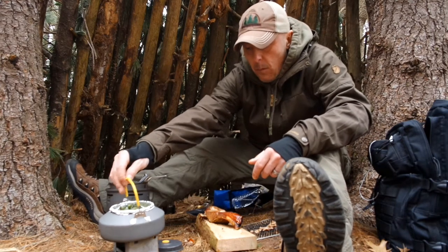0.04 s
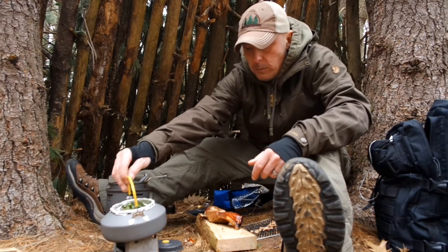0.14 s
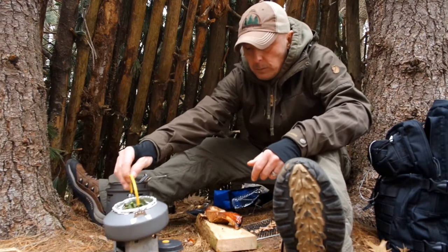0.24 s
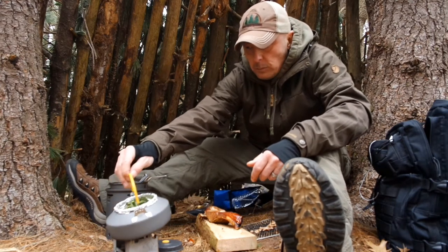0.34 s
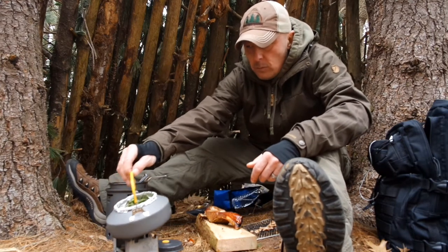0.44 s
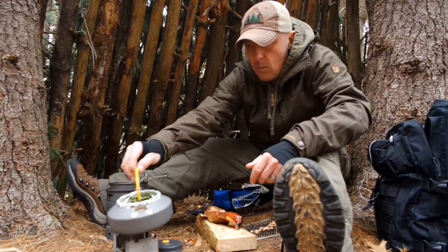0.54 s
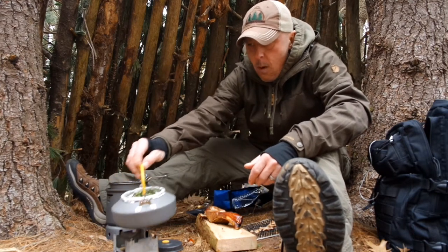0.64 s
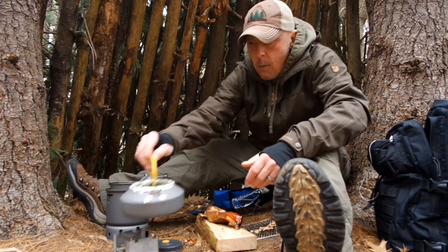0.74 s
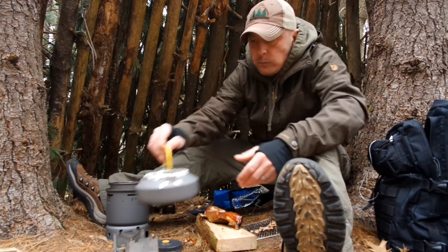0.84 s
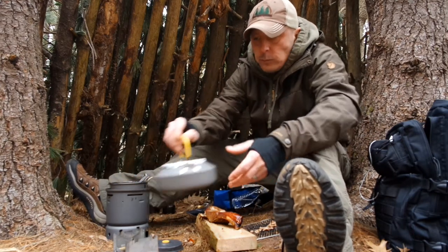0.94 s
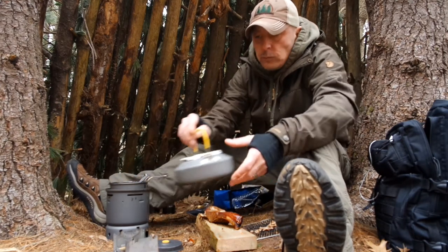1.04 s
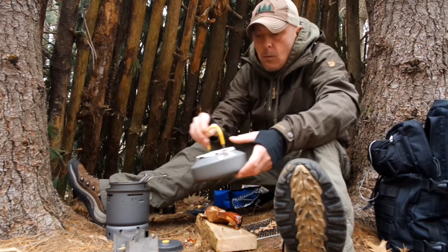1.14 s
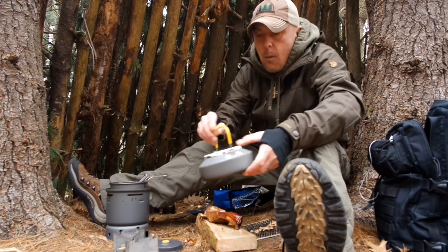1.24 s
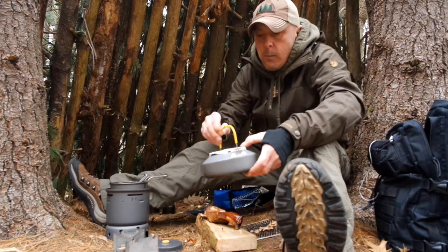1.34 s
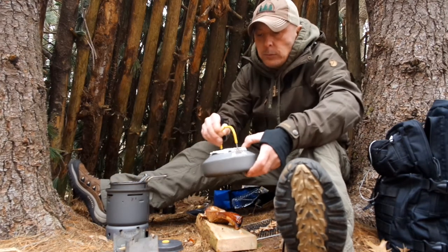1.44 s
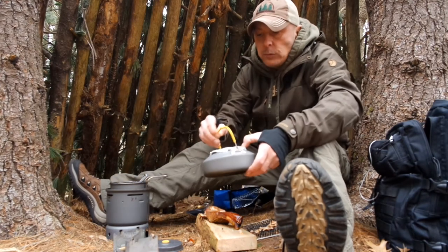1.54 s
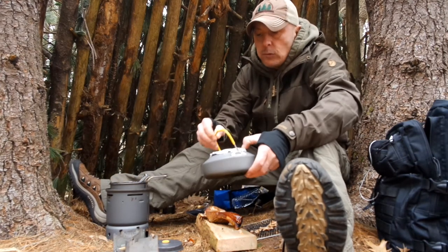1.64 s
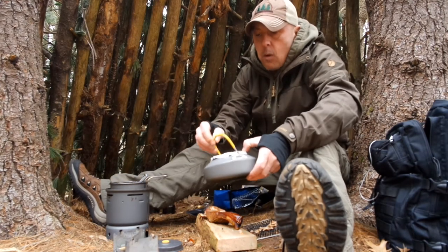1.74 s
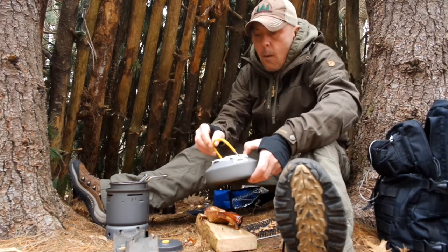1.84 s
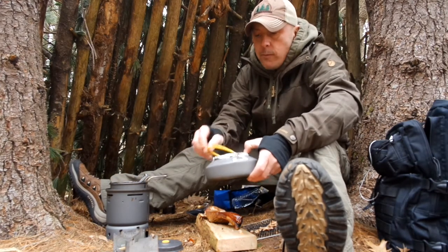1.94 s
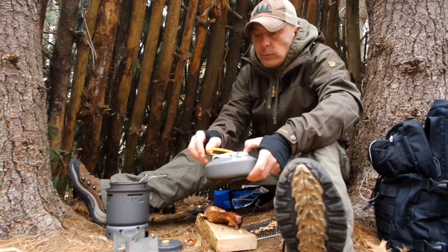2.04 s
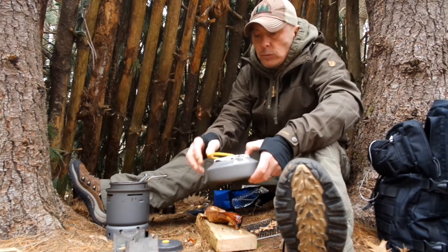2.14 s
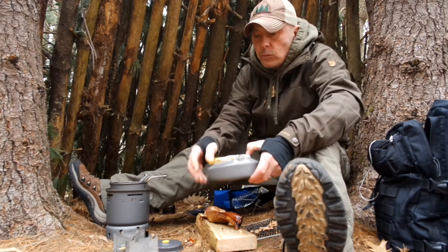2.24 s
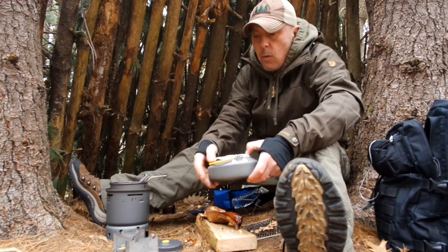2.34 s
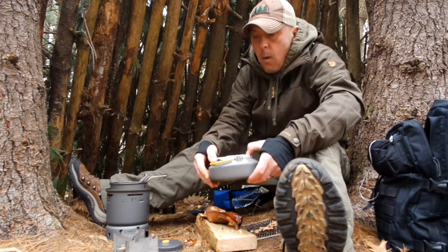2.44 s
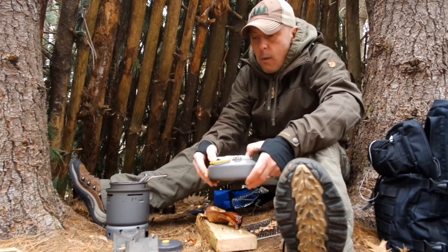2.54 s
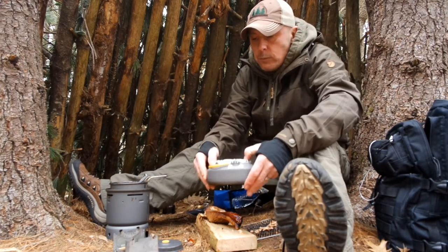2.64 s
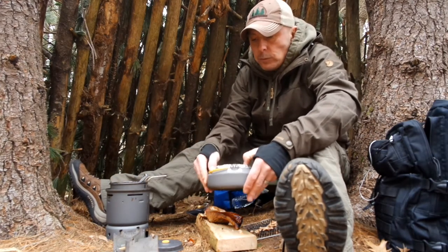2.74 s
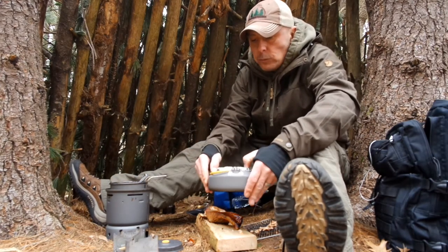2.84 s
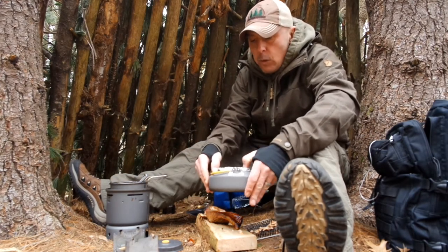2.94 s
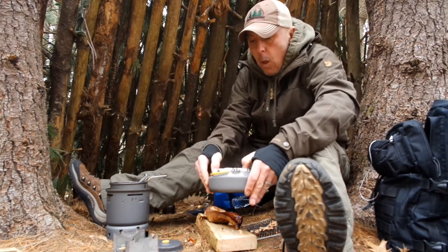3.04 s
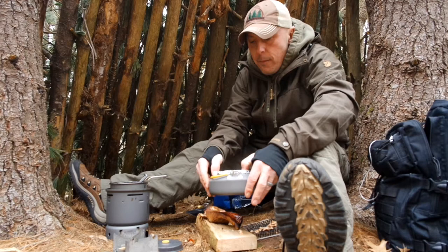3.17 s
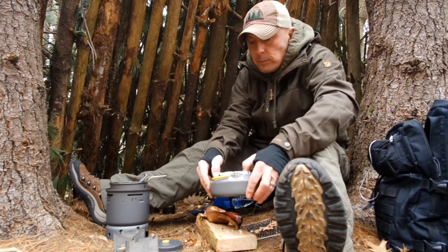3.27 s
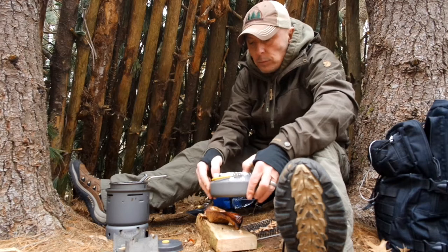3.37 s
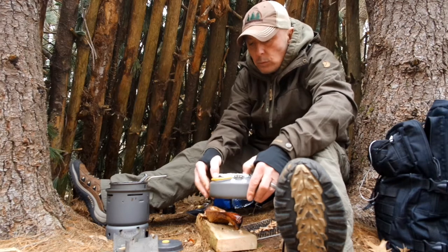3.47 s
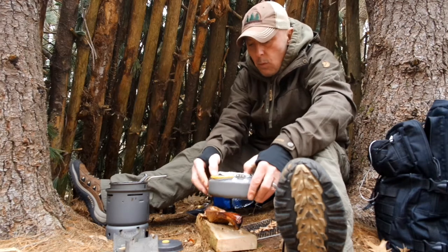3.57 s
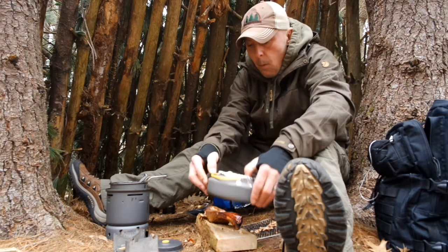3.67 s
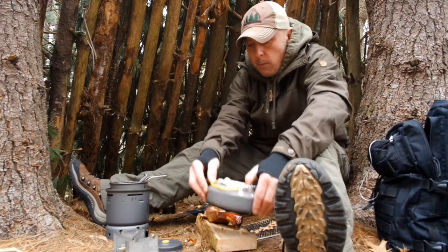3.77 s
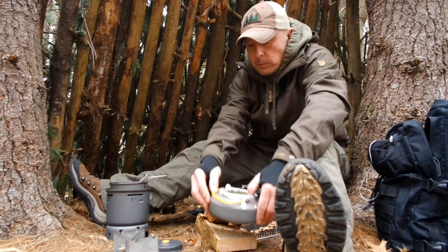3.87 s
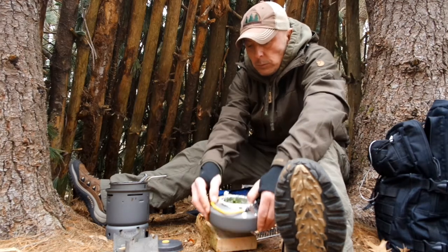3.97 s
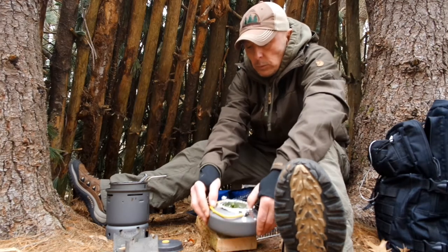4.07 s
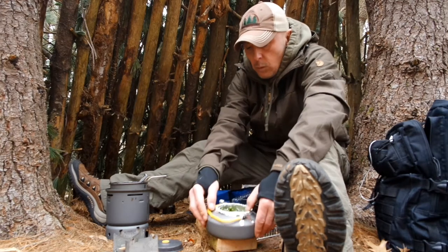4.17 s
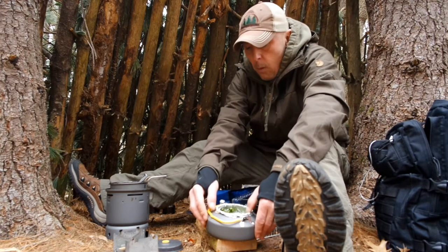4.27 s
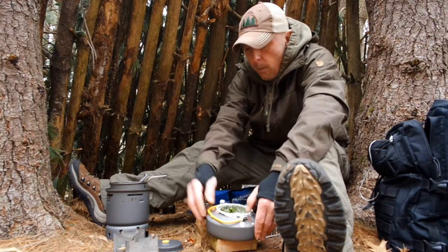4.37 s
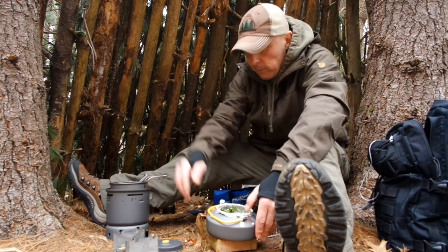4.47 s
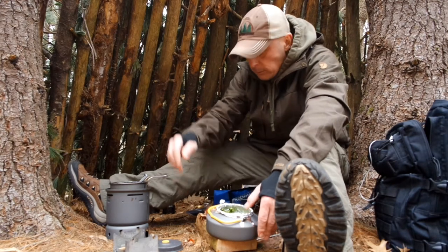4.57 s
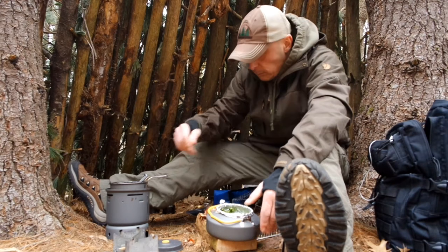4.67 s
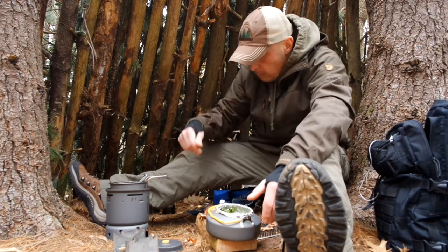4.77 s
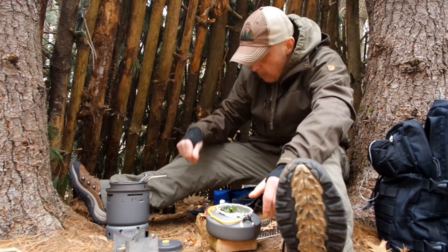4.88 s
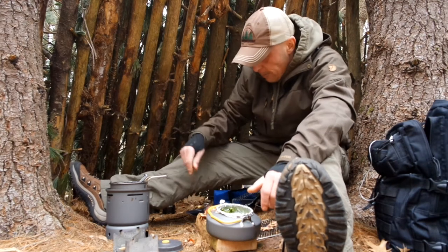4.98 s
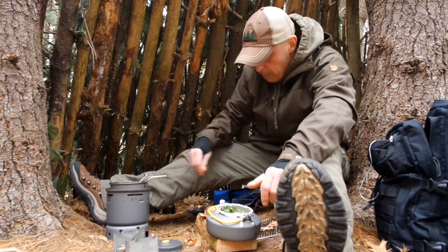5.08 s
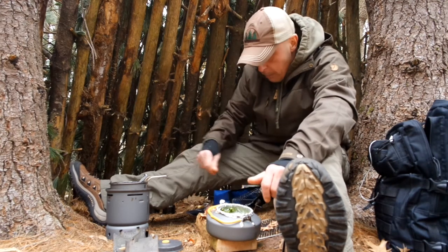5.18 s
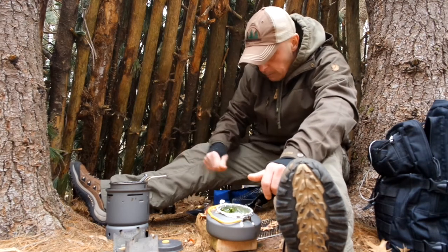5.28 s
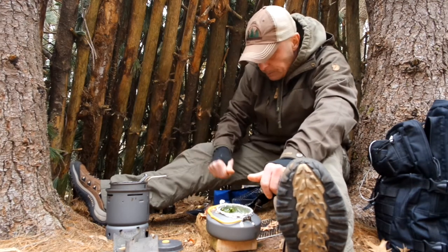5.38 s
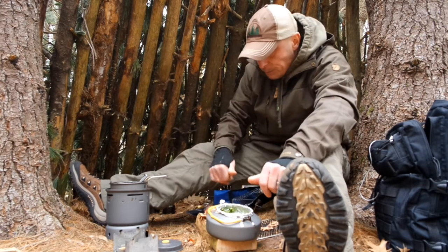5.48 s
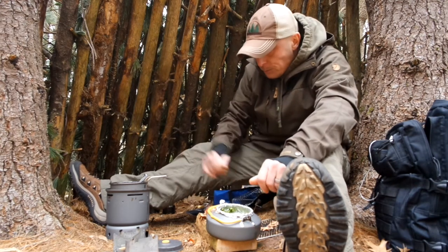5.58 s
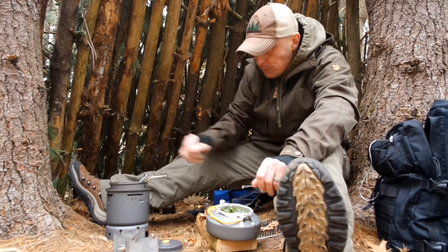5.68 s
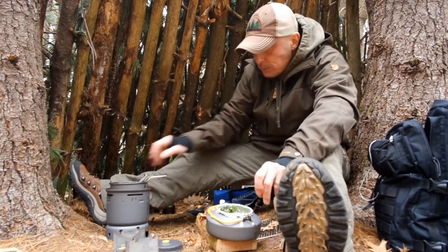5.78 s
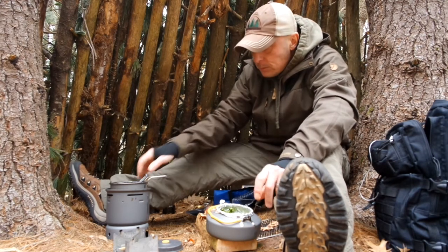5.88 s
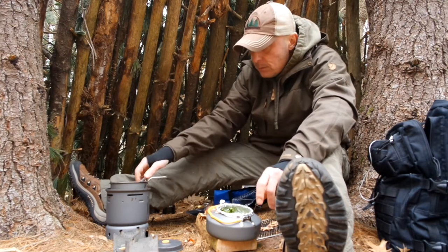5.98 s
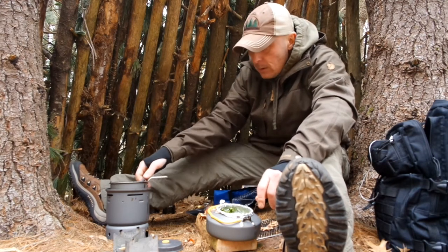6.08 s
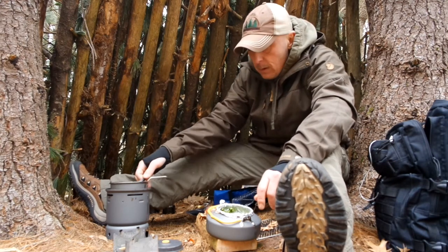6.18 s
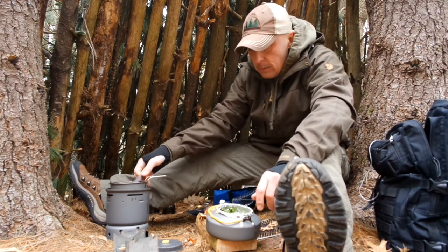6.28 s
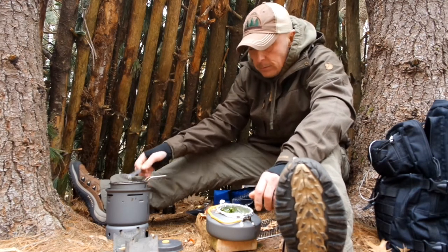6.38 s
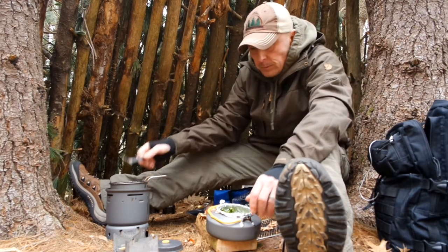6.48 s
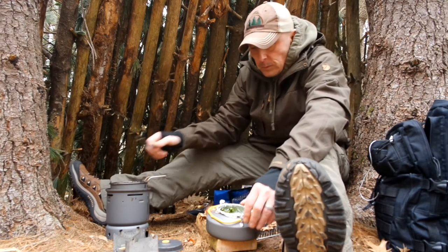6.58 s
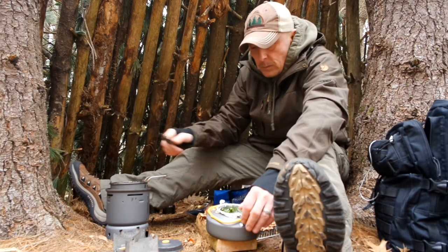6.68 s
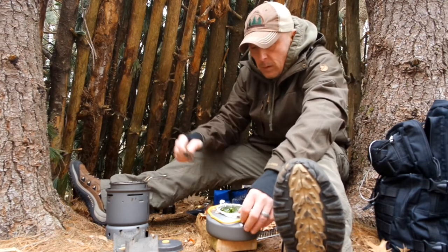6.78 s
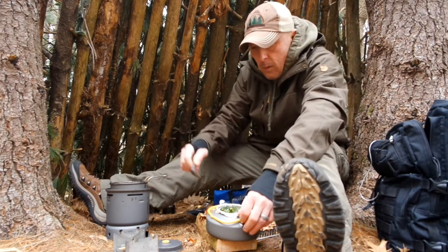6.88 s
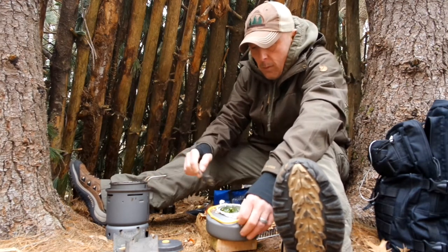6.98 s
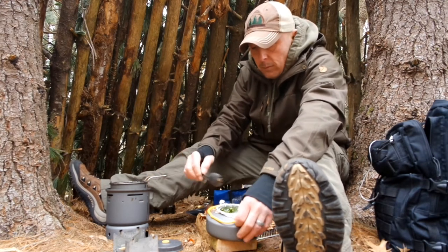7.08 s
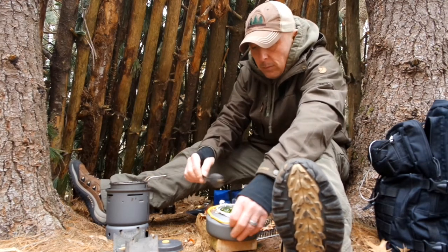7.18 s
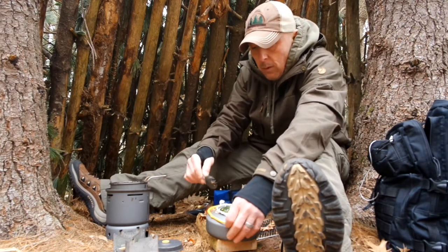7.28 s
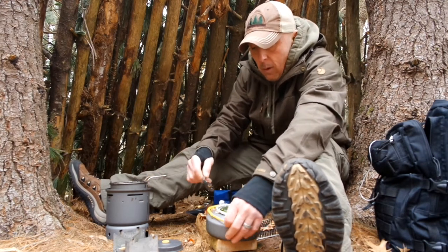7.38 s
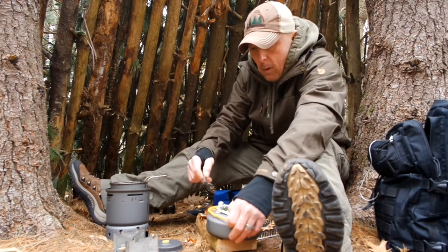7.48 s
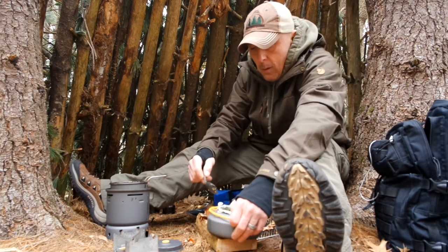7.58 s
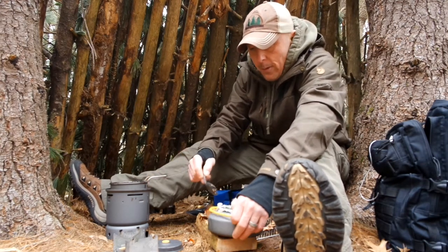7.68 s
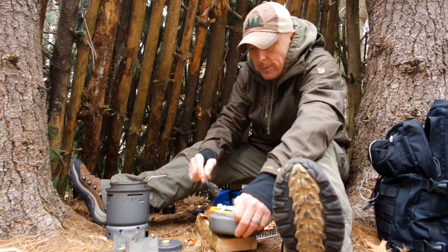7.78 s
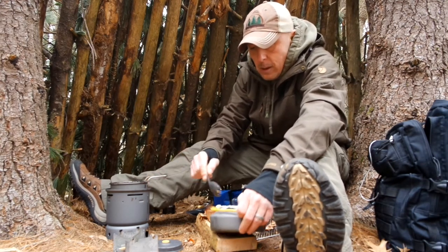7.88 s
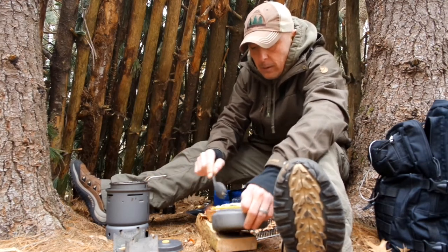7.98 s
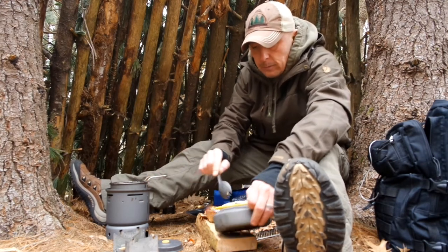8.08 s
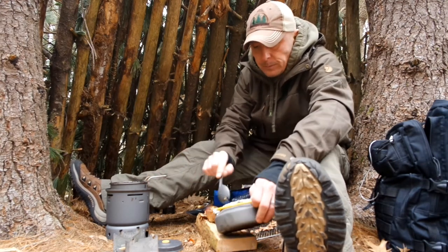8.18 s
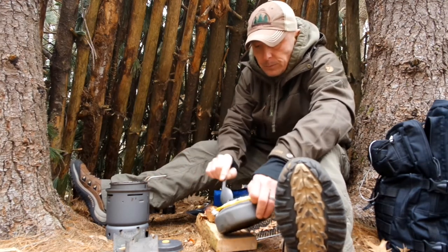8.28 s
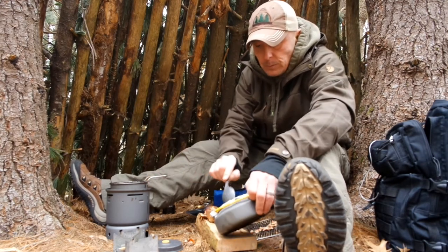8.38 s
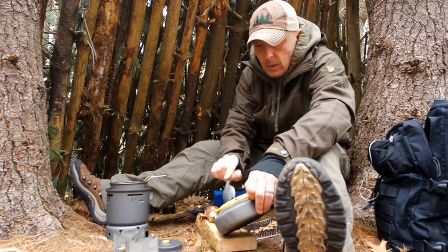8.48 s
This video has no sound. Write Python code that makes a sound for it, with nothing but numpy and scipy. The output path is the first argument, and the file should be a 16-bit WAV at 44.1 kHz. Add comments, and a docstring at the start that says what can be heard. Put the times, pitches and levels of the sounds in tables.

```python
"""In a lean-to of poles, a camper lifts a shallow metal pot off its stove, folds the handle down with
a clack, sets the pot on a board and takes a spoon to it. Each contact is chattering noise that also
rings decaying sine modes; dry snaps are coloured noise bursts. His jacket, noise under slow swells,
swishes and rumbles in a microphone worn on it. Sparse echoes and the camera's own steady noise lie behind."""
import sys
import numpy as np
from scipy import signal
from scipy.fft import next_fast_len
from scipy.io import wavfile
from scipy.ndimage import uniform_filter1d

SR = 44100
rng = np.random.default_rng(int(sys.argv[2]) if len(sys.argv) > 2 else 0)


def persist_wave(psi):
    """Save psi, clipped to +-1, as 16-bit WAV."""
    counts = np.round(np.clip(psi, -1, 1) * 32767).astype(np.int16)
    wavfile.write(sys.argv[1], SR, np.atleast_2d(counts).T)


N = 375638

# Arm and body moves: (peak time [s], swell [s], fade [s], sleeve rubbing level [dB],
# level of cloth bumping the microphone [dB])
MOVES = [(.02, 0.25, 0.7, -64.5, -54.5), (.38, 0.24, 0.28, -61, -54), (1.02, 0.22, 0.31, -57.5, -52),
         (1.22, 0.24, 0.33, -52, -42.5), (1.54, 0.33, 0.39, -63, -48.5), (1.78, 0.2, 0.16, -57.5, -43.5),
         (2.081, 0.22, 0.26, -61, -51.5), (2.58, 0.73, .5, -68, -50.5), (2.95, 0.36, 0.39, -59, -44.5),
         (3.66, 0.67, 0.56, -72, -64.5), (4.02, 0.42, 0.18, -66.5, -63.5), (4.33, 0.14, 0.18, -56, -51),
         (4.87, .7, 0.7, -69.5, -69), (5.26, 0.18, 0.28, -63.5, -62.5), (5.81, 0.23, 0.12, -64.5, -63),
         (6.2, 0.058, 0.43, -56.5, -50.5), (6.62, 0.46, 0.43, -67.5, -74), (7.08, 0.34, 0.56, -69.5, -68),
         (7.52, 0.1, .25, -56.5, -46), (7.95, 0.17, 0.5, -67.5, -60)]


def gain_of(db):
    """Turns decibels into an amplitude factor."""
    return 10 ** (np.asarray(db) / 20)


def evened(x):
    """Scales a signal to rms 1."""
    return x / np.sqrt(np.mean(x ** 2) + 1e-20)


def coloured(x, points):
    """Filters x by (frequency [Hz], level [dB]) points on a log-frequency axis, with causal phase."""
    size = next_fast_len(len(x) + 2048)
    hz, db = np.transpose(points)
    log_hz = np.log(abs(np.fft.fftfreq(size, 1 / SR)) + 1)
    log_gain = np.interp(log_hz, np.log(hz), db) * np.log(10) / 20
    # The Hilbert transform of the log gain gives the minimum phase
    response = np.exp(np.conj(signal.hilbert(log_gain)))
    return np.fft.ifft(np.fft.fft(x, size) * response).real[:len(x)]


def add(mix, s, sound):
    """Lays a sound into the mix from s seconds on, cut off at the end."""
    part = mix[round(s * SR):][:len(sound)]
    part += sound[:len(part)]


def drift(cutoff_hz):
    """Slow random wandering of rms 1: noise below a cutoff."""
    return evened(signal.lfilter(*signal.butter(2, cutoff_hz, fs=SR), rng.standard_normal(N)))


def camera_hiss():
    """The camera's own steady noise, weighted towards the bass."""
    # Spectrum: (frequency [Hz], relative level per Hz [dB])
    hiss_spectrum = [(12, -35.5), (30, -6.5), (117, -2), (429, -19), (800, -19.5), (6600, -32.5),
                     (13000, -30), (14700, -26)]
    return gain_of(-69) * evened(coloured(rng.standard_normal(N), hiss_spectrum))


def shelter(near):
    """Ground and poles throw back sparse, dulled echoes that die quickly."""
    t = np.arange(SR // 4) / SR
    signs = rng.choice([-1., 1.], len(t))
    sparse = (rng.random(len(t)) < .05) * (t > .004)  # no echo before 4 ms
    taps = signs * sparse * gain_of(-60 * t / 0.49)
    taps = coloured(taps, [(200, -1.5), (2000, -2.5), (14000, -14.5)])
    return signal.fftconvolve(near, taps / np.linalg.norm(taps))[:N]


def effort(peak_db):
    """Gain over time: the moves swell to a peak and fade, their powers adding up."""
    edge_db, roundness = -21.5, 1.12  # drop one swell before or one fade after the peak; shape of the top
    t = np.arange(0, N, 64) / SR
    peak, swell, fade = np.transpose(MOVES)[:3, :, None]
    away = np.where(t < peak, (peak - t) / swell, (t - peak) / fade)
    power = (gain_of(peak_db[:, None] + edge_db * away ** roundness) ** 2).sum(0)
    return np.interp(np.arange(N) / SR, t, np.sqrt(power))


def jacket():
    """Cloth on cloth hisses in fine uneven grains; folds bump the worn microphone in slow lumps."""
    # Spectrum of the rubbing: (frequency [Hz], relative level per Hz [dB])
    swish_spectrum = [(120, -28), (200, -5), (630, -5.5), (1760, -7), (5270, -13.5), (9000, -14),
                      (13000, -11), (14700, -15)]
    # Spectrum of the bumping: (frequency [Hz], relative level per Hz [dB])
    rumble_spectrum = [(7.1, -33.5), (12, -2), (71, 0), (127, -9), (168, -11.5), (500, -30.5), (650, -62),
                       (1100, -120)]
    still_rub_db, still_bump_db = -85, -75  # floors between moves
    rub_db, bump_db = np.transpose(MOVES)[3:]

    fibres = rng.standard_normal(N) * gain_of(1.5 * drift(30.0) + 0.65 * drift(440.0))
    rub_gain = np.hypot(effort(rub_db), gain_of(still_rub_db))
    swish = evened(coloured(fibres, swish_spectrum)) * rub_gain

    lumps = rng.standard_normal(N) * gain_of(3.2 * drift(14.))
    bump_gain = np.hypot(effort(bump_db), gain_of(still_bump_db))
    rumble = evened(coloured(lumps, rumble_spectrum)) * bump_gain
    return swish + rumble


def burst(rise, t60, tick, size):
    """Contact chatter: a first tick, then uneven grains that swell and die, the treble first."""
    t = np.arange(size) / SR
    noise, grain = rng.standard_normal((2, size))
    noise *= gain_of(3.6 * evened(uniform_filter1d(grain, size=24)))
    dull = signal.lfilter(*signal.butter(2, 5000., fs=SR), noise)
    bright = noise - dull
    decay = gain_of(-60 * t / max(t60, .003))
    chatter = (1 - np.exp(-t / rise)) * (dull * decay + bright * decay ** 1.5)
    chatter[0] += tick
    return chatter


def snaps():
    """Dry snaps, ticks and small knocks: short noise bursts, 12 dB down one spread from their centre."""
    # (time [s], peak level [dB], centre [Hz], spread [octaves])
    snap_list = [(.080, -25.5, 6760, 2.15), (0.191, -56.5, 2320, 0.066), (.541, -53.5, 2480, 0.58),
                 (1.175, -39.5, 810, 0.17), (1.338, -38, 11700, 0.72), (1.573, -42.5, 8050, 1.3),
                 (1.653, -45.5, 9000, 2.1), (1.757, -41.5, 2100, 0.24), (1.762, -31.5, 11900, 1.2),
                 (1.795, -34, 2360, 0.97), (1.823, -46, 10700, 0.34), (1.904, -52, 9100, 0.76),
                 (1.993, -44, 10100, 1.2), (2.245, -57.5, 3203, .4), (2.43, -55, 1470, 0.21),
                 (2.996, -38.5, 473, 0.12), (2.996, -42, 2350, 0.22), (3.997, -42.5, 493, 0.26),
                 (7.999, -42.5, 468, 0.09), (3.099, -45.5, 4930, 2.1), (3.81, -58.5, 2520, .3),
                 (4.387, -41.5, 2250, 0.25), (4.586, -51.5, 5000, 2.24), (6.275, -37, 9200, 2),
                 (6.79, -54.5, 7070, 1.56), (6.89, -50, 12100, 0.53), (7.637, -50, 8500, .9),
                 (7.974, -58.5, 11600, 0.43), (8.008, -50, 9900, 0.58)]
    out = np.zeros(N)
    for s, db, hz, spread in snap_list:
        colour = [(hz * 2 ** (k * spread), -12 * abs(k)) for k in range(-3, 4)]
        sound = coloured(burst(0.00032, 0.022, 4.5, 4096), colour)
        add(out, s, gain_of(db) * sound / abs(sound).max())
    return out


def crowd(lo_hz, hi_hz, top_db, mean_t60, count):
    """Thin sheet has many weak, short modes between its main ones."""
    place, strength, life = rng.random((3, count))
    hz = lo_hz + (hi_hz - lo_hz) * place
    return list(zip(hz, top_db - 8 * strength, mean_t60 * (.5 + life)))


def metal(hits, modes, slow_start, ring_db, tick, clean, held_s, spot_db):
    """Each contact is heard directly and through the modes; a hand or the board stops the ring."""
    ring_per_body = 0.32  # a fuller, softer blow rings the metal more: dB of ring per dB of low body
    out, t = np.zeros(N), np.arange(SR // 4) / SR
    rings = np.array([gain_of(db - 60 * t / t60) * np.sin(2 * np.pi * hz * t) for hz, db, t60 in modes])
    rings /= np.linalg.norm(rings)
    # Where it is touched favours other modes
    spots = gain_of(spot_db * rng.standard_normal((len(hits), len(modes))))
    muted = 1 / (1 + np.exp((t - held_s) / 0.0064))
    for (s, db, low_db, treble_db, t60), spot in zip(hits, spots):
        # A long contact also starts slowly
        chatter = burst(max(slow_start * t60 ** 2, 2e-4), t60, tick, len(t))
        # clean = 1 strikes the modes with one blow, 0 drives them with the chatter, as a scrape does
        blow = np.linalg.norm(chatter) * (t == 0)
        push = (1 - clean) * chatter + clean * blow
        ring = muted * signal.fftconvolve(push, spot @ rings)[:len(t)]
        both = chatter + gain_of(ring_db + ring_per_body * low_db) * ring
        low = [(150, low_db - 14), (350, low_db + 3), (1300, low_db + 4.5)]
        sound = coloured(both, low + [(2300, -18), (4500, -13.5), (11000, treble_db)])
        add(out, s, gain_of(db) * sound / abs(sound).max())
    return out


def stove_stand():
    """Scraping contacts ring the stand's main modes and a crowd of weak ones."""
    # Contacts: (time [s], peak level [dB], low body [dB], treble [dB], chatter T60 [s])
    stand_hits = [(.002, -45.5, -14.5, -46, 0.062), (.255, -50.5, -18, -22, 0.16),
                  (.293, -42.5, -15, -24, 0.097), (.35, -46.5, -30, -37, 0.11),
                  (.368, -40, -24.5, -13, 0.076), (.417, -46, -16, -23, 0.11), (.447, -52, 5, -37, 0.16)]
    # Modes: (frequency [Hz], relative level [dB], T60 [s])
    stand_modes = [(431, -8, .1), (958, -7, .08), (1163, -8, .17), (1340, -4, .06), (2200, -4, .08),
                   (2440, 1, .09), (3079, -5, .08), (3510, -11, .14), (4950, -8, .1), (6400, -12, .12),
                   (7990, -8, .08)]
    all_modes = stand_modes + crowd(1000., 12000., -11., .08, count=36)
    return metal(stand_hits, all_modes, slow_start=1.9, ring_db=12, tick=.1, clean=0, held_s=.09, spot_db=3.5)


def spoon():
    """Light chattering contacts ring short modes, with a crowd of weak high ones."""
    # Contacts: (time [s], peak level [dB], low body [dB], treble [dB], chatter T60 [s])
    spoon_hits = [(6.054, -55.5, -19.5, -17.5, .04), (6.066, -50, -29, 7.5, .08),
                  (6.112, -55, -30.5, 6, .1), (6.1565, -19.5, -21, 1.5, 0.066),
                  (6.172, -40.5, -4, -16, 0.16), (6.1955, -27, -24, -14, 0.071), (6.222, -32, -18, 12, .08),
                  (6.242, -42, -11, 7, 0.074), (6.29, -38, -14.5, -17, 0.29),
                  (6.325, -25.5, -20, -13.5, 0.11), (6.398, -52.5, -13, -12, .05),
                  (7.244, -37, -18, 0.7, 0.14), (7.4125, -38.5, -17, -3.5, .033),
                  (7.4861, -30, -19, 14, .015), (7.5405, -25, -32, 3, 0.042), (7.585, -27, -23, -6, .039),
                  (7.5899, -21, -32, 2, 0.018), (7.889, -40.5, -16, -4, .1)]
    # Modes: (frequency [Hz], relative level [dB], T60 [s])
    spoon_modes = [(880, -8, .04), (2520, 0, .1), (2900, 1, .03), (3300, -6, .09), (3800, 1, .06),
                   (5850, -2, .07), (6900, -5, .05)]
    all_modes = spoon_modes + crowd(4080.0, 14800., -9.0, 0.06, count=40)
    return metal(spoon_hits, all_modes, slow_start=0.7, ring_db=-2, tick=.6, clean=0, held_s=.08, spot_db=3.)


def pot():
    """Mostly clean blows, each with a sharp first tick, ring the shallow pot's modes."""
    # Contacts: (time [s], peak level [dB], low body [dB], treble [dB], chatter T60 [s])
    pot_hits = [(2.0358, -16.5, -31, -14, 0.028), (1.9, -55, -34, -33, 0.4),
                (2.0557, -26.5, -16, -15, 0.043), (2.3259, -30.5, -22, -11, 0.073),
                (2.3412, 6.5, -33, -7.5, 0.04), (2.3464, -6.5, -19.5, -7.5, 0.025),
                (2.8321, -42, -11, -39, 0.056), (2.9661, -35, -10, -8, 0.013), (2.9981, -36, -7.5, 0, 0.03),
                (3.0353, -25.5, -31.5, -22, 0.0058), (3.0581, -32.5, -17, -10.5, 0.051),
                (3.8823, -47, -14, -21, 0.054), (4.22, -59, -1, -40, .2), (4.2818, -23, 5, -38.5, 0.017),
                (4.29, -23.5, -4, -21, 0.05), (7.4616, -10.5, -15, -13, 0.045)]
    # Modes: (frequency [Hz], relative level [dB], T60 [s])
    pot_modes = [(305, -2, .07), (477, -1, .11), (575, -6, .05), (734, -17, .26), (972, -4, .11),
                 (1225, -22, .3), (1350, -7, .07), (2050, 0, .045), (2783, -11, .15), (3354, -4, .06),
                 (3600, 5, .05), (3920, -1, .075), (4030, -9, .17), (4270, -12, .11), (4900, 0, .04),
                 (5460, 0, .04), (6420, 2, .03), (7345, -4, .05), (8000, 2, .035), (12590, 2, .03),
                 (12940, 3, .03), (14310, 3, .03), (14850, 1, .03)]
    return metal(pot_hits, pot_modes, slow_start=0.6, ring_db=3.5, tick=4.0, clean=.75, held_s=.1, spot_db=1.5)


def scene():
    """Metal and snaps in the lean-to, over the jacket and the camera's own noise."""
    near = pot() + stove_stand() + spoon() + snaps()
    echoes = gain_of(-30.0) * shelter(near)
    return (near + echoes + jacket() + camera_hiss())[None]


def record(dry):
    """The band limit, then the converter's ceiling."""
    edge_hz = 15150
    lowpass = signal.firwin(511, edge_hz, window=("kaiser", 7), fs=SR)
    limited = signal.oaconvolve(dry, lowpass[None], "same")
    return np.clip(limited, -1, 1)


dry = scene()
out = record(dry)
persist_wave(out)
```